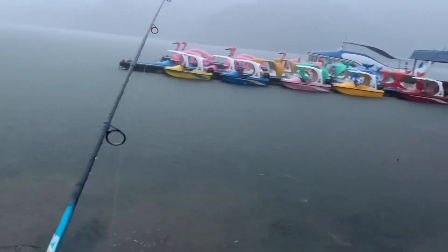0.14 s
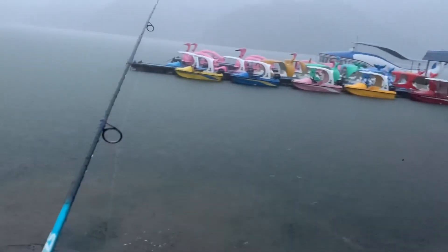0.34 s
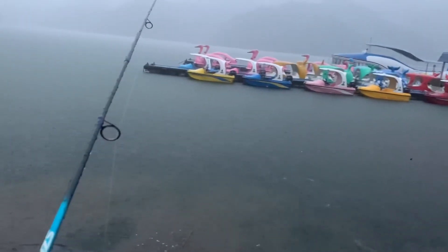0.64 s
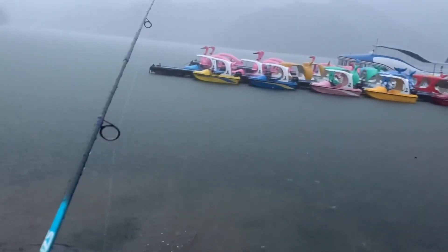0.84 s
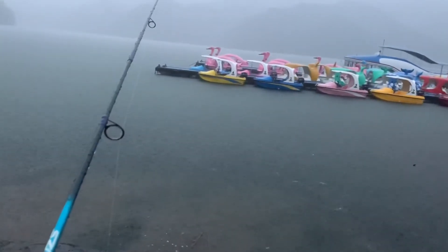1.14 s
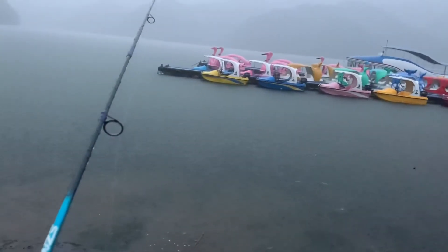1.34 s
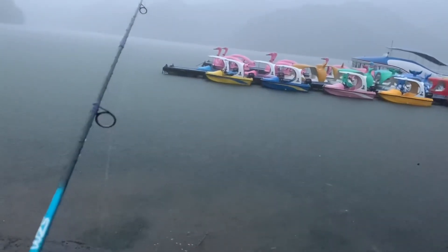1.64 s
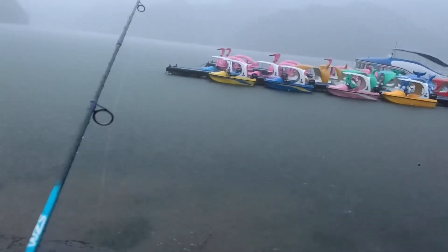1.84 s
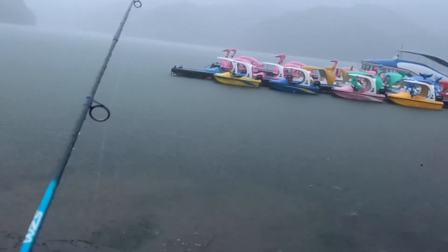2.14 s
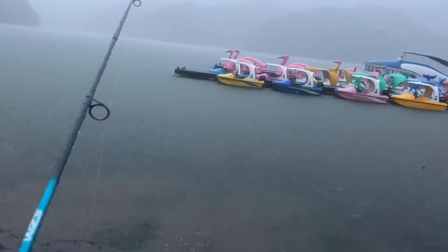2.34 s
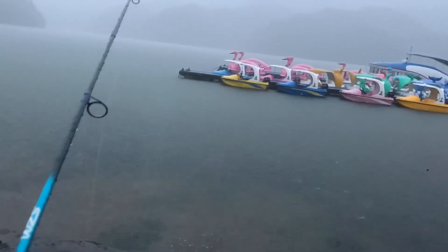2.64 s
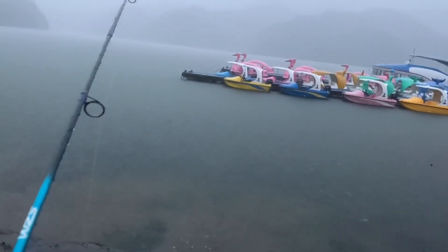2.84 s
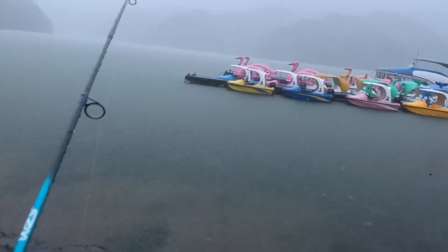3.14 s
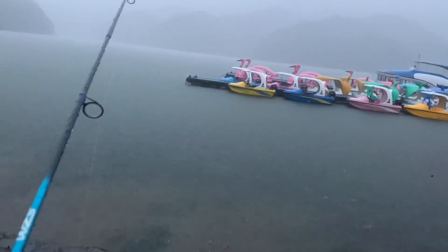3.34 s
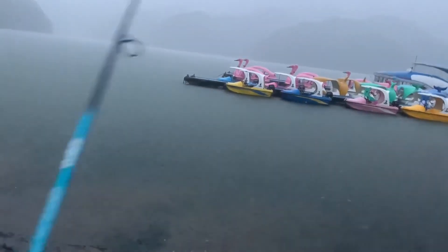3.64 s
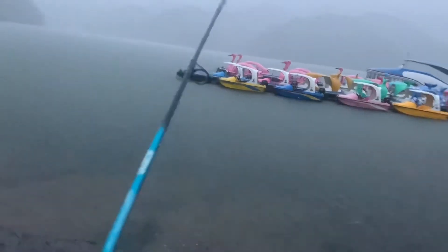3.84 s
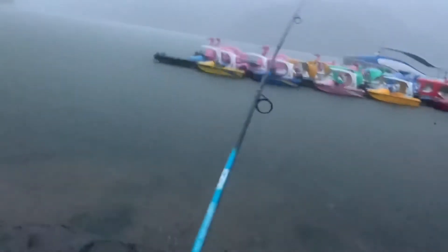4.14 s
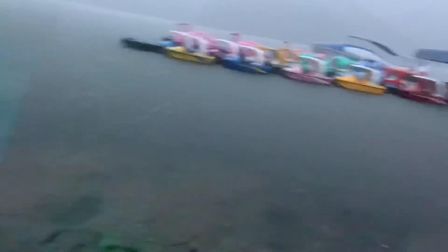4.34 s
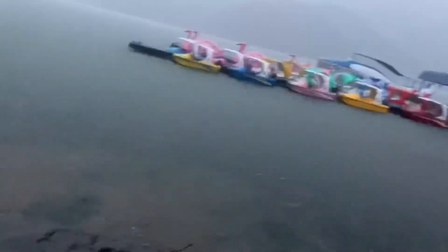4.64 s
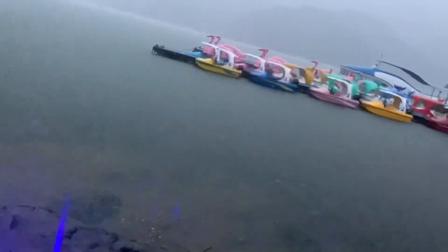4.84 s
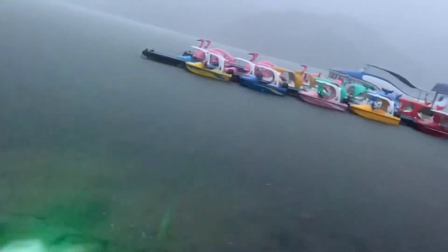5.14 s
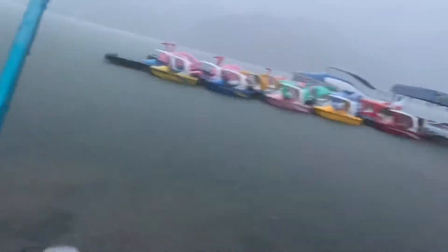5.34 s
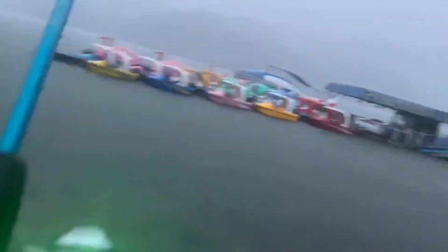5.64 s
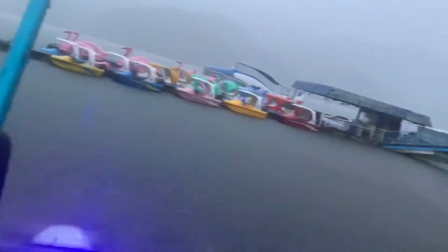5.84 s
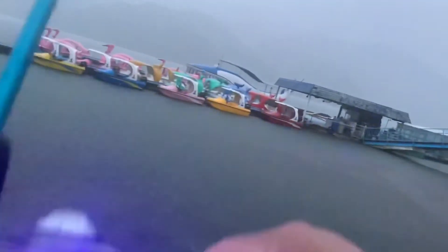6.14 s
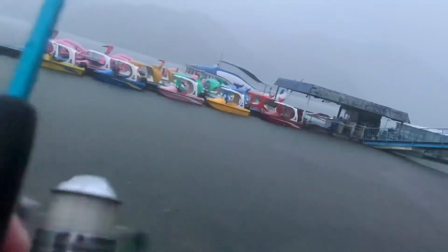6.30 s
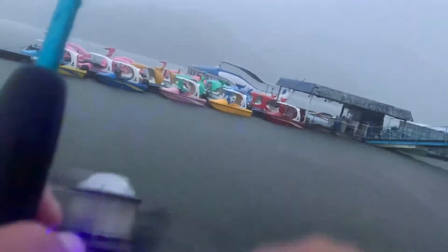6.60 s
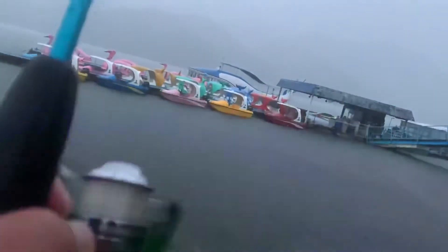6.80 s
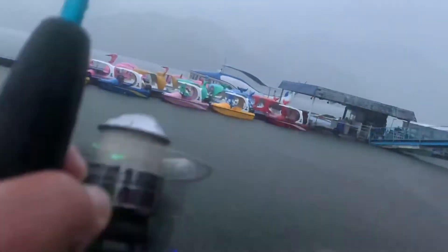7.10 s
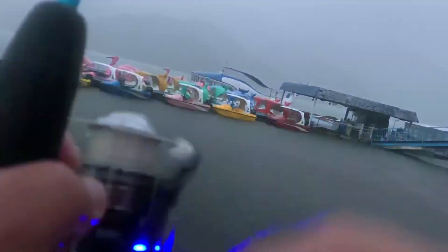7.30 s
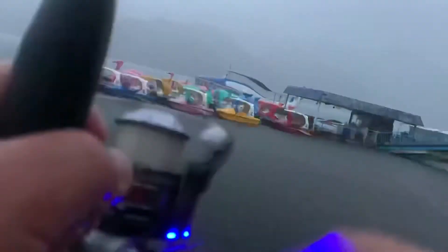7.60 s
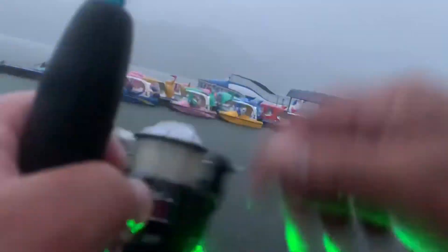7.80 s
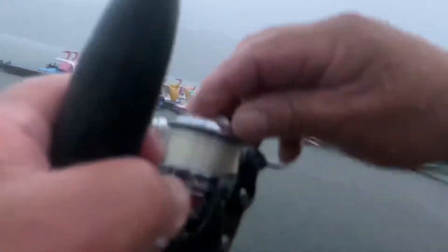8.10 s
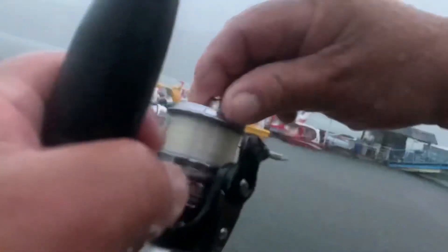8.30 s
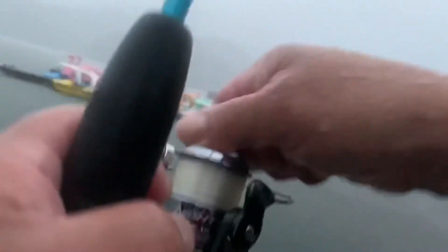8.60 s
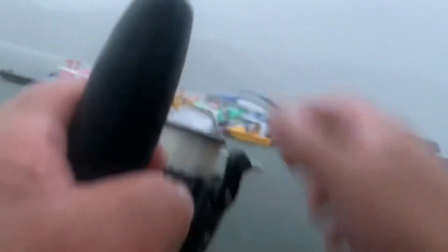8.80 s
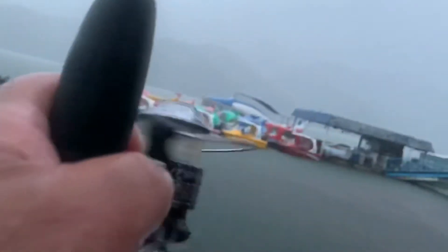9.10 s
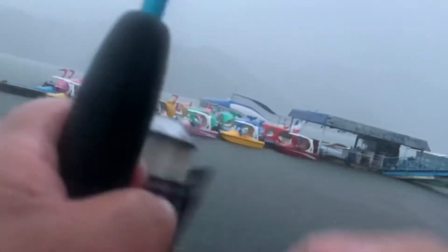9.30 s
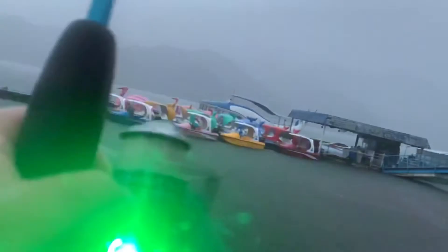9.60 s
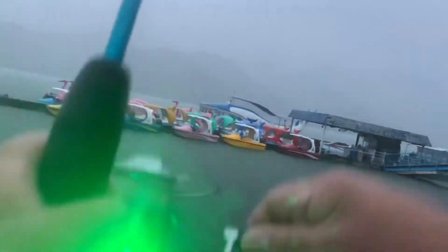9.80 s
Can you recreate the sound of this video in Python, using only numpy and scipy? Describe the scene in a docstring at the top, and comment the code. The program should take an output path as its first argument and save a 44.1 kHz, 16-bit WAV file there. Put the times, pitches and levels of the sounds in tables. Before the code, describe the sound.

Thickening rain on water, bright reel clicks running into fast ratcheting buzzes, scattered sharp knocks, and low bumps of wind and handling.

```python
"""Steady rain on a lake, drumming close by and hissing off the water, heard by a small hand-held camera.
A reel's drag clicker ticks and buzzes as line leaves the spool: each tooth excites resonant noise.
Wind buffets as lumpy low noise; drops and fingers thump the housing as rounded pushes with ticks, and
short tones start just before some thumps. Rain and clicker dip after hard blows;
the camera delays bass behind treble and colours its right channel.
"""
import sys
import numpy as np
from scipy import signal
from scipy.fft import rfft, irfft, next_fast_len
from scipy.io import wavfile
from scipy.ndimage import uniform_filter1d, map_coordinates

SR = 44100
rng = np.random.default_rng(int(sys.argv[2]) if len(sys.argv) > 2 else 0)


def store_wav(level_fs):
    """Save 16-bit WAV to argv[1]."""
    pcm = np.round(np.clip(np.atleast_2d(level_fs), -1, 1) * 32767)
    wavfile.write(sys.argv[1], SR, pcm.T.astype(np.int16))


N = 438780


def amp(db):
    """Turn dB into a linear gain."""
    return 10 ** (np.asarray(db) / 20)


def unit(x):
    """Scale to rms 1."""
    return x / np.sqrt(np.mean(x ** 2) + 1e-20)


def along(points, hz):
    """Read a curve of (f/Hz, value) points on a log frequency axis."""
    f, v = np.transpose(points)
    return np.interp(np.log(hz + 1), np.log(f + 1), v)


def wobble(rate):
    """A smooth random curve with rate knots a second."""
    knots = rng.standard_normal(int(N * rate / SR) + 4)
    return map_coordinates(knots, [np.arange(N) * rate / SR])


def filtered(x, response):
    """Shape x by a complex response of frequency."""
    m = next_fast_len(N + SR // 2)
    return irfft(rfft(x, m) * response(np.fft.rfftfreq(m, 1 / SR)), m)[..., :N]


# How alike left and right sound at each pitch, before the right is coloured: [f/Hz, correlation 0-1]
STEREO_LIKENESS = [(60, 1), (400, 0.826), (720, 0.136), (1300, 0.444), (1900, 0.543), (2350, 0.233),
                   (3000, 1), (3750, 0.17), (4500, 0.975), (5600, 1), (6500, 1), (16000, 1)]


def stereo(pair, gain):
    """Two unrelated signals, coloured by gain(Hz), become mid and side so left and right are as alike as set."""
    def mid_side_gains(hz):
        turn = np.arccos(np.clip(along(STEREO_LIKENESS, hz), -1, 1)) / 2
        return gain(hz) * [np.cos(turn), np.sin(turn)]

    mid, side = filtered(pair, mid_side_gains)
    return np.array([mid + side, mid - side])


def patter(spectrum, patchy_db, drops_hz, drop_db, spread_db, drop_s):
    """Far drops blur into patchy noise; near drops lift it for a moment, a few of them strongly."""
    bins = signal.stft(rng.standard_normal((2, N)), nperseg=256)[2]
    patches = uniform_filter1d(rng.standard_normal(bins.shape[1:]), size=5, axis=0)
    patches = unit(uniform_filter1d(patches, size=12, axis=1))
    far = signal.istft(bins * amp(patchy_db * patches), nperseg=256)[1][:, :N]
    chance = rng.random((2, N))
    strength = amp(drop_db - spread_db * np.log(1 - chance[1]))
    near = (chance[0] < drops_hz / SR) * strength
    near = signal.lfilter([1], [1, -np.exp(-1 / (drop_s * SR))], near)  # each lift dies away over drop_s
    return unit(stereo(far * (1 + near), lambda hz: amp(along(spectrum, hz))))


# Overall rain level, growing heavier: [t/s, level/dB]
RAIN_LEVEL = [(0, -45.5), (1.8, -43), (3.5, -42), (4.3, -40.5), (6.1, -40), (6.6, -41), (7.35, -40.5),
              (8.6, -38.5), (9.95, -39.5)]
# Colour of the rain on the near shore: [f/Hz, relative level/dB per Hz]
DRUMMING_COLOUR = [(30, -4.5), (60, -2.5), (150, -0.5), (350, -1.5), (620, -4.5), (900, -14), (2000, -56)]
# Colour of the rain on the water: [f/Hz, relative level/dB per Hz]
HISS_COLOUR = [(200, -37.5), (600, -5), (1000, -2.5), (2000, -1.5), (4000, -1.5), (5500, -11), (7500, -6.5),
               (11000, -7), (14000, -14), (16000, -22.5)]


def rain():
    """Low drumming close by and a hiss off the water, each a bed of far drops with near ones on top."""
    drumming = patter(DRUMMING_COLOUR, patchy_db=0.91, drops_hz=25.5, drop_db=-9, spread_db=4.5, drop_s=0.0058)
    hiss = patter(HISS_COLOUR, patchy_db=1.5, drops_hz=60.34, drop_db=-4.5, spread_db=3, drop_s=0.001135)
    swell_db = .5 * wobble(3)
    drumming_db = -1.11 + swell_db + 0.15 * wobble(12)
    level_db = np.interp(np.arange(N) / SR, *np.transpose(RAIN_LEVEL))
    return amp(level_db) * (amp(drumming_db) * drumming + amp(swell_db / 2) * hiss)


# Puffs of wind on the camera: [t/s, peak level/dB, time to fall by 20 dB/s]
PUFFS = [(.03, -27, 0.1136), (.3, -47, 0.23), (5.77, -36, 0.14), (5.88, -35, 0.0138), (5.98, -28.5, 0.0434),
         (6.1, -39, 0.08), (6.2, -31.5, 0.0949), (8.605, -27.5, 0.1144), (8.652, -27.5, 0.11),
         (8.74, -33, 0.04), (8.9, -32.5, .15), (8.95, -24.5, 0.0781), (9.1, -21.5, 0.0147),
         (9.27, -41.5, 0.02)]
# Colour of the buffeting: [f/Hz, relative level/dB per Hz]
BUFFET_COLOUR = [(15, -45), (40, 7.5), (75, 2.5), (150, -11.5), (350, -30), (800, -50.5), (2500, -120)]


def wind():
    """Each puff swells and dies evenly in dB and buffets the camera in lumps of low noise."""
    t = np.arange(N) / SR
    level = sum(amp(db - 20 * np.abs(t - s) / fall_s) for s, db, fall_s in PUFFS)
    lumps = amp(3.5 * wobble(30))
    noise = stereo(rng.standard_normal((2, N)), lambda hz: amp(along(BUFFET_COLOUR, hz)))
    return level * unit(lumps * noise)


def pushes(rows, spray_db, spray_hz):
    """Contact gives a rounded push, partly taken back by rebound, with a shorter, noisy tick at its front."""
    out, t = np.zeros((2, N + SR)), np.arange(SR // 20) / SR
    low_pass = signal.butter(4, spray_hz, fs=SR)
    for s, push_db, contact_ms, rebound, tick_db in rows:
        u = t / (contact_ms / 1000)
        bump = (u / 2) ** 2 * np.exp(2 - u)  # crests after two contact times
        push = amp(push_db) * bump * (1 - np.clip(rebound, 0, 1) * u / 3)
        v = u / .25  # the tick's pulse crests after a quarter of a contact time
        shared = rng.standard_normal(len(t))
        spray = shared + 0.64 * rng.standard_normal((2, len(t)))
        spray = amp(spray_db - 60 * t / 0.00232) * spray
        tick = amp(tick_db) * (v * np.exp(1 - v) + signal.lfilter(*low_pass, spray))
        out[:, round(s * SR):][:, :len(t)] += push + tick
    return out[:, :N]


# Rod and reel knocking, drops on them:
# [t/s, push level before rebound/dB, contact time scale/ms, rebound 0-1, tick level/dB]
KNOCKS = [(1.026, -40.5, 0.064, .8, -14.5), (1.226, -36.5, 0.185, .8, -20), (1.254, -45, 0.054, .8, -18),
          (2.54, -35.5, 0.215, .8, -21.5), (3.154, -18, 0.185, 1, -20), (3.647, -36, 0.095, 1, -11.5),
          (3.813, -14, 0.634, 0.9, -55), (3.917, -40.5, 0.051, 0.7, -14), (3.948, -14.5, 0.49, 1, -45),
          (3.981, -19, 0.5, 0.73, -45), (4.787, -1.5, 0.524, 1, -60), (4.871, -22, 0.435, 0.47, -39.5),
          (5.62, -31, 0.104, 0.82, -9.5), (6.332, -39.5, 0.0696, 0.84, -6), (6.413, -40, .25, 0.78, -40.5),
          (7.894, -35.5, 0.163, 0.78, -14.5), (8.399, -18.5, 0.386, 1, -16.5),
          (8.638, -11.5, 0.124, 1, -26), (8.71, -14.5, 0.5, 0.5, -41), (8.945, -14, 0.88, 0.23, -45.5),
          (9.162, -30, 0.106, .8, -12), (9.256, -21, 0.23, 0.7, -18), (9.359, -30.5, 0.2, 0.8, -40.5),
          (9.678, -45, 0.038, .8, -21), (9.841, -34, 0.146, 1, -10), (9.932, -34.5, 0.144, 0.98, -16.5)]


def knocks():
    """Rod and reel knock and catch drops: pushes with a bright spray of noise in each tick."""
    return pushes(KNOCKS, spray_db=-6, spray_hz=7230)


# Drops and fingers on the housing:
# [t/s, push level before rebound/dB, contact time scale/ms, rebound 0-1, tick level/dB], before the muffling
BLOWS = [(.015, -4.5, 0.15, 0.34, -12), (.0262, -8, 0.377, 0.39, 3.5), (.119, -18, 0.53, 0.42, -35.5),
         (.163, -30.5, 0.176, 0.2, -44.5), (.64, 1.5, 0.225, 0.16, -2), (.821, 2.5, 0.1083, 0.07, -27.5),
         (3.199, -20.5, 0.255, 0.55, -43.5), (3.279, -11.5, 0.327, 0.88, -45),
         (6.2225, 7.5, 0.391, 0.46, 3), (8.7605, 2.5, 0.923, 0.97, 7.5), (9.127, -39.5, 0.308, 0.49, -10.5),
         (9.758, -12.5, 0.5, 1, -28.5), (9.799, -37.5, 0.274, 0.65, -10.5)]
# Short tones that start just before some blows: [t/s, level before build-up and decay/dB], before the muffling
TONES = [(.004, -16), (.015, -6), (.629, -32), (8.749, -15.5)]
# Pitch and decay of these tones: (f/Hz, time to fall by 60 dB/s)
TONE_PITCH_DECAY = (571, 0.0415)


def blows():
    """Pushes on the housing, with short sine tones that build up and die away, all with the treble muffled."""
    tones, t = np.zeros(N + SR), np.arange(SR // 10) / SR
    hz, t60 = TONE_PITCH_DECAY
    for s, db in TONES:
        build_up = 1 - np.exp(-t / 0.00136)
        tones[round(s * SR):][:len(t)] += amp(db - 60 * t / t60) * build_up * np.sin(2 * np.pi * hz * t)
    thumps = pushes(BLOWS, spray_db=-16, spray_hz=3600)
    muffle_hz = 5590  # the housing passes little above this
    return filtered(thumps + tones[:N], lambda f: 1 / (1 + (f / muffle_hz) ** 6))


# How far rain and clicker dip at the hardest blows: [t/s, depth/dB]
DIPS = [(0.033, 27), (.647, 10), (.824, 0), (6.226, 3), (8.763, 11.5)]


def dips():
    """Gain that drops at each listed time, stays down a moment and climbs back at a steady rate in dB."""
    t = np.arange(N) / SR
    hold_s, climb_db_per_s = 0.091, 121
    each_db = [(t > s) * np.clip(db - climb_db_per_s * (t - s - hold_s), 0, db) for s, db in DIPS]
    return amp(-uniform_filter1d(np.max(each_db, axis=0), size=180))  # 180 samples soften the edges


def teeth(pull):
    """Times and levels (t/s, level/dB) of the teeth of one pull, a little uneven in both."""
    when, passed, db = np.transpose(pull)
    tooth = np.arange(round(passed[-1]) + 1)
    chance = rng.standard_normal((len(tooth), 2))
    tooth_s = np.interp(tooth, passed, when) + 0.000273 * chance[:, 0]
    tooth_db = np.interp(tooth, passed, db) + 2.435 * chance[:, 1]
    return np.transpose([tooth_s, tooth_db])


# The spool creeps, one tooth at a time: [t/s, relative click level/dB]
TICKS = [(4.2571, -21.5), (4.2755, -21), (4.5478, -28), (4.5559, -33), (4.583, -27), (4.606, -30.5),
         (4.6647, -27), (4.7048, -24), (4.7337, -27), (4.757, -23.5), (4.94, -23), (4.9636, -26),
         (5.009, -22), (5.0454, -17), (5.0739, -19.5), (5.0992, -24.5), (5.1211, -21), (5.1423, -26),
         (5.1667, -24), (5.1909, -22), (5.2116, -20), (5.2317, -22.5), (5.2732, -23.5), (5.4132, -25.5),
         (5.441, -21), (5.461, -23.5), (5.6136, -22.5), (5.6377, -20), (5.6794, -23), (5.7199, -19.5),
         (5.7475, -23), (5.7673, -20.5), (5.7828, -20.5), (6.8011, -23), (6.819, -19), (6.8432, -20),
         (6.8764, -22), (6.9037, -20.5), (6.9234, -24), (6.9406, -24.5), (7.7093, -20.5), (7.74, -23),
         (7.7796, -22), (7.8144, -21.5), (8.0047, -16.5), (8.2656, -16.5), (8.2822, -27), (8.3109, -25.5),
         (8.3358, -26), (8.3439, -23), (8.3694, -30), (8.3803, -27.5), (8.4014, -28), (8.4619, -29.5),
         (8.4869, -24.5), (8.5063, -31), (8.529, -28), (8.553, -25.5), (8.5724, -28), (8.591, -27.5),
         (8.6072, -28), (8.633, -25)]
# Line pulled fast, clicks running into a buzz; one list a pull:
# [t/s, teeth that have passed the spring, relative click level/dB]
PULLS = [
    [(4.2858, -0.5, -23.5), (4.3124, 3, -24.5), (4.3565, 10, -24.5), (4.4522, 27, -26.5),
     (4.4709, 30.5, -29.5), (4.5065, 35.5, -27.5), (4.5322, 38, -29)],
    [(4.7766, 0, -21.5), (4.8241, 3, -24), (4.862, 6, -24.5), (4.8964, 9.5, -25), (4.9243, 11.5, -23.5)],
    [(5.4787, 0, -23.5), (5.5075, 2, -24), (5.5808, 9, -23.5), (5.5953, 9, -20.5)],
    [(5.7957, 0, -21), (5.8703, 7, -20.5), (5.924, 11, -20.5), (5.991, 17, -22.5), (6.0675, 23, -24),
     (6.161, 33.5, -22.5), (6.2186, 42, -21.5), (6.2811, 50.5, -25), (6.3762, 64.5, -25.5),
     (6.444, 75, -23.5), (6.5361, 87, -21.5), (6.6239, 97.5, -22), (6.7183, 104, -21), (6.7863, 109.5, -24)],
    [(6.9559, 0, -22.5), (6.989, 3, -22.5), (7.0531, 9.5, -21.5), (7.1293, 19, -22.5), (7.2154, 29, -21),
     (7.2837, 36, -24.5), (7.4022, 50, -21.5), (7.4769, 58, -21), (7.5296, 64, -20), (7.5682, 67.5, -20),
     (7.647, 75, -19.5), (7.6884, 77, -17)],
]
# Resonances of spring and spool: [f/Hz, width/Hz, relative level/dB]
CLICKER_RESONANCES = [(1477, 278, -6.5), (4423, 230, -5.5), (4827, 325, -8), (7222, 839, 3),
                      (8783, 1228, -0.5), (10160, 874, 1), (12100, 930, 0), (15840, 810, -18)]


def clicker():
    """The spring snaps off every tooth: a short rattle of noise through the resonances of spring and spool."""
    when, click_db = np.vstack([TICKS] + [teeth(pull) for pull in PULLS]).T
    snaps = np.zeros(N)
    snaps[np.round(when * SR).astype(int)] = amp(click_db)
    t = np.arange(SR // 40) / SR
    decay = amp(-60 * t / 0.006357) + 0.0984 * amp(-60 * t / 0.0342)  # fast fall with a faint longer tail
    rattle = (1 - np.exp(-t / 0.0005415)) ** 2 * decay

    def ring(f):
        total = 0
        for k, (centre, width, db) in enumerate(CLICKER_RESONANCES):
            peak = 1j * f * width / (centre * centre - f * f + 1j * f * width)
            total = total + (-1) ** k * amp(db) * peak  # neighbours in opposite polarity
        return np.abs(total)

    noise = signal.fftconvolve(snaps, rattle)[:N] * rng.standard_normal((2, N))
    return amp(16.5) * stereo(noise, ring)


def sides(x, right):
    """Leave the left channel alone; colour and phase-shift the right one."""
    f, gain_db, lead = np.transpose(right)

    def response(hz):
        right_gain = amp(np.interp(hz, f, gain_db)) * np.exp(1j * np.interp(hz, f, lead))
        return [hz ** 0, right_gain]

    return filtered(x, response)


# Right channel against left for sound through the air: [f/Hz, level/dB, phase lead/rad]
RIGHT_AIR = [(0, -1, 0.5), (309.6, 0, 0), (662, -10.5, -2), (750, -17, 3.5), (1042, -6, 1.03),
             (1570, -6, 1), (2154, -10.5, 0.43), (2644, -17, -3), (3086, -8, -2), (3820, -17.5, -4),
             (4320, -8.5, 1.02), (5082, 0, 1), (5570, -12.5, 1), (6353.5, -0.5, 2.5), (16473, 0, 16)]
# Right channel against left for sound through the housing: [f/Hz, level/dB, phase lead/rad]
RIGHT_HOUSING = [(0, .3, .5), (300, 0, .6), (600, 0, 1.4), (1000, -5, 1.7), (1400, -9, 3), (2500, -13, 5),
                 (4500, -9, 7), (6200, 0, 9), (16300, 0, 22)]


def scene():
    """Sound through the air and sound through the housing reach the channels differently."""
    air = dips() * (rain() + clicker()) + wind() + knocks()
    return sides(air, RIGHT_AIR) + sides(blows(), RIGHT_HOUSING)


def record(dry):
    """A phase shift that delays low pitches most, turning a push into a falling chirp, then band limits."""
    def response(hz):
        # delay a little over one period at most pitches
        late = np.exp(-2j * np.pi * (1.16 * np.log((hz + 22) / SR) - 0.07))
        low_cut = -hz ** 2 / (58 ** 2 - hz ** 2 + 1j * hz * 45)  # slightly resonant
        fade = amp(np.interp(hz, [15700, 16000], [0, -22]))
        top_hz = 16900  # nothing from here up
        return late * low_cut * fade * (hz < top_hz)

    return filtered(dry, response)


dry = scene()
out = record(dry)
store_wav(out)
```